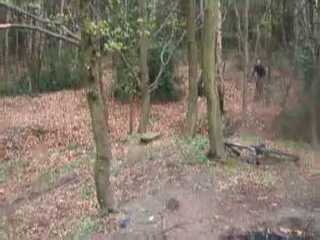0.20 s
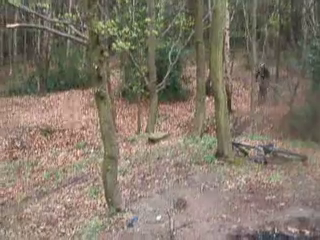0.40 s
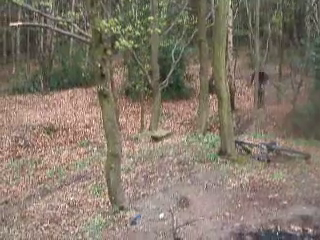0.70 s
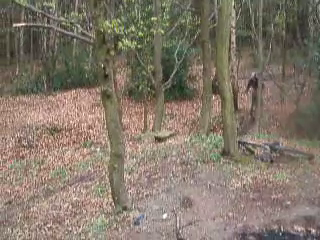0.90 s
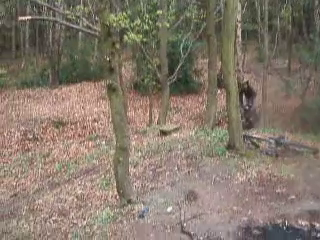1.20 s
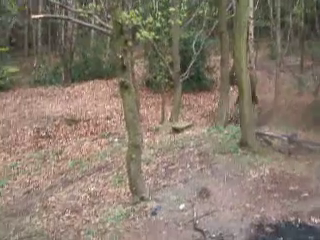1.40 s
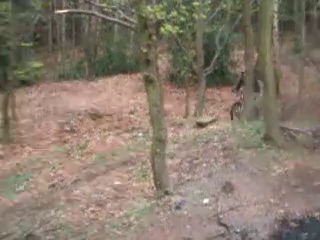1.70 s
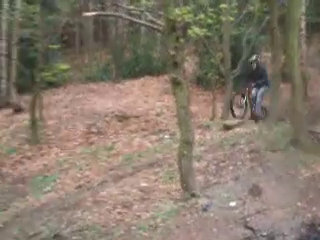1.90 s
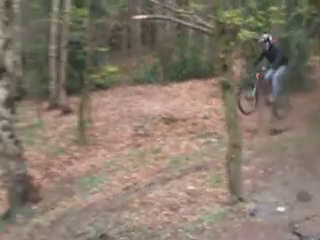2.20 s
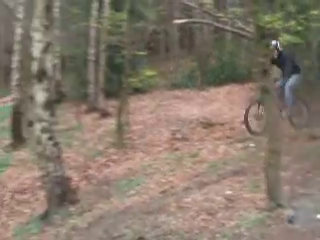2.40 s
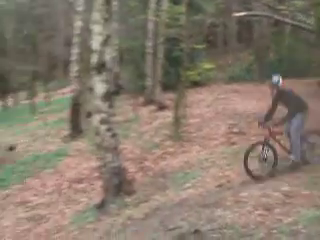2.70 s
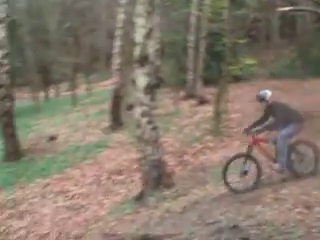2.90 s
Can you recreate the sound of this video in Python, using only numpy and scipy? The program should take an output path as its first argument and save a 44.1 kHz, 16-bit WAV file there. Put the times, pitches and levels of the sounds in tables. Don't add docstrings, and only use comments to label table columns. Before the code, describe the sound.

Bike landing with a sharp metallic chain slap and leaf crunch, after quiet woodland rumble and birdsong.

```python
import sys
import numpy as np
from scipy import signal
from scipy.fft import irfft
from scipy.io import wavfile
from scipy.ndimage import uniform_filter1d, map_coordinates

SR = 44100
rng = np.random.default_rng(int(sys.argv[2]) if len(sys.argv) > 2 else 0)


def to_wav(sig):
    pcm = np.clip(np.atleast_2d(sig), -1, 1) * 32767
    pcm = np.round(pcm).astype(np.int16)
    wavfile.write(sys.argv[1], SR, pcm.T)


def elevation(decibels):
    levels = np.asarray(decibels, float)
    return 10 ** (levels / 20)


N = 133623

# [t/s, level/dB]
TYRE_LOAD = [(.62, -60), (.78, -53), (.9, -58.5), (1.55, -51), (1.85, -57), (2.0, -52.5), (2.11, -46.5),
             (2.17, -52), (2.3, -57.5), (2.794, -66), (2.805, -34), (2.838, -38), (2.85, -34.5),
             (2.865, -39), (2.89, -35.5), (2.93, -43), (2.985, -40), (3.01, -44)]
# [f/Hz, density/dB]
LEAF_COLOUR = [(300, -17), (1400, -10.5), (2400, -3), (4300, -1), (6500, -1), (8000, -7.5)]
# [t/s, peak/dB, f/Hz, t60/s,
# resonance sharpness]
SNAPS = [(0.932, -43, 4630, 0.08, 2.5), (1.011, -39.5, 4920, .04, 1.4), (1.258, -46, 3800, 0.016, 2),
         (2.074, -37.5, 2110, 0.074, 16), (2.105, -43, 4500, .15, 2.2), (2.12, -41.5, 5210, .1, 1.5),
         (2.378, -37.5, 3870, 0.033, 1.1), (2.803, -22.5, 6440, .035, 8), (2.806, -29.5, 2460, 0.033, 3),
         (2.823, -26.5, 4460, 0.056, 9), (2.849, -30.5, 4180, 0.063, 5), (2.868, -25.5, 6420, 0.038, 2.5),
         (2.926, -36, 6740, .2, 2.5), (2.945, -34, 7150, .2, 3), (2.964, -35.5, 7050, 0.15, 1.7)]
# [t/s, peak/dB, f/Hz, t60/s]
CRACKLES = [(2.7965, -36, 1497, .03), (2.799, -37, 650, .08), (2.81, -37.5, 1700, .06),
            (2.82, -32, 4300, .04), (2.835, -38.5, 1200, .06), (2.8, -36, 3500, .012),
            (2.804, -31, 4580, .04), (2.811, -31, 5400, .02), (2.8132, -32.5, 2280, .015),
            (2.816, -30.5, 6970, .02), (2.818, -30, 2750, .02), (2.829, -32, 7350, .02),
            (2.831, -28, 2310, .015), (2.844, -30.5, 3010, .015), (2.845, -29.5, 4970, .02),
            (2.8494, -29, 2510, 0.022), (2.856, -32.5, 4550, .012), (2.867, -31, 3400, .015),
            (2.878, -27.5, 7000, .015), (2.886, -32.5, 5180, .02), (2.921, -33.5, 2740, .012),
            (2.956, -32.5, 4320, 0.014), (2.962, -32, 5500, .008), (2.9677, -27, 6500, 0.0092),
            (2.971, -31.5, 6030, .008), (2.976, -29, 7080, .012), (2.9811, -24, 5300, .012),
            (2.989, -32, 6020, .012), (2.994, -31.5, 5200, .012)]
# [t/s, peak/dB, f/Hz]
TICKS = [(2.2564, -43, 6340), (2.3805, -39, 4030), (2.4858, -46, 3980), (2.4994, -43.5, 5300),
         (2.5396, -42, 6690), (2.5477, -42, 4180), (2.5767, -41, 3740), (2.611, -43, 3980),
         (2.6429, -45, 5620), (2.6736, -44, 5190), (2.6997, -46, 4510), (2.7299, -43, 5830),
         (2.7564, -43, 5780)]
# [t/s, slap peak/dB, thump/dB, pitch factor of the spot struck]
KNOCKS = [
    (.65, -70, -39, 1),
    (2.055, -60, -36, 1.2),
    (2.797, -36, -39, .6),
    (2.8774, -30, -60, .9),
    (2.8781, -6.5, -42, 1),
    (2.8799, -14, -60, 1.15),
    (2.8826, -21, -60, 1.1),
    (2.8858, -23, -60, .8),
    (2.8893, -19, -47, 1.4),
    (2.8925, -23, -60, .5),
]
# [f/Hz, level/dB, t60/s]
FRAME_MODES = [(750, -19, .02), (1250, -7, .007), (1630, 0, .009), (2200, -4, .009), (2800, -8, .008),
               (3330, -6, .012), (4450, -20, .006)]
# [t/s, length/s, f/Hz, warble depth/Hz, level/dB]
SONG = [(0.836, 0.073, 3087, 7.7, -63.5), (0.889, 0.068, 2685, 89, -53.5), (.95, .09, 2766, 143, -53.5),
        (1.041, .15, 2735, 140, -57), (1.26, 0.051, 3273, 45, -52.5), (1.256, .05, 2992, 210, -56),
        (1.315, .08, 3161, 20, -48), (1.305, 0.097, 2923, 80, -54), (1.439, 0.031, 3104, 180, -56),
        (1.6, 0.039, 3320, 36, -48), (1.62, .04, 2797, 30, -53.5), (1.645, 0.091, 3149, 60, -47),
        (1.69, .1, 2853, 35, -56.5), (1.84, 0.049, 3150, 30, -61), (1.655, .08, 3300, 20, -53),
        (1.59, .1, 2950, 60, -58), (1.74, .08, 2790, 30, -56), (1.33, .06, 2760, 60, -58),
        (2.007, 0.031, 3320, 30, -50), (2.0, .11, 2950, 120, -52.5), (2.06, .13, 3130, 70, -52),
        (2.192, 0.055, 2750, 89, -55.5), (2.433, 0.067, 3310, 150, -55.5), (2.441, 0.098, 2939, 52, -55.5),
        (2.511, .05, 3144, 35, -48.5), (2.575, 0.033, 3200, 35, -54.5), (2.53, 0.038, 2845, 37, -56.5),
        (2.605, .07, 3000, 150, -55), (2.36, 0.12, 4600, 61, -61), (2.21, .1, 4800, 60, -61),
        (2.28, 0.18, 3150, 120, -62), (2.57, .12, 3800, 15, -68)]
# [t/s, f/Hz, level/dB]
DRONE = [(0.11, 107, -50.5), (0.47, 105.1, -58.5), (0.66, 107.4, -77.5), (0.7, 107.3, -61),
         (0.92, 104.4, -62), (1.28, 104.3, -50), (1.58, 103.6, -58), (1.98, 104.7, -50.5),
         (1.99, 104.3, -56), (2.03, 104, -59.5), (2.33, 104.2, -60), (2.49, 106.7, -62), (2.71, 104.6, -54),
         (3.0, 104.2, -62)]
# [t/s, level/dB]
TRAFFIC = [(0, -45), (.3, -45.4), (.6, -46), (.7, -44.6), (.8, -46), (1.0, -47), (1.3, -45), (1.55, -47),
           (1.76, -48), (1.9, -45.5), (2.1, -45), (2.35, -49.5), (2.75, -51), (3.03, -50)]
# [f/Hz, density/dB]
RUMBLE_COLOUR = [(20, -31.5), (70, -19.5), (130, -10.5), (240, 1), (340, -3.5), (760, -10.5), (1400, -22),
                 (3000, -32.5)]
# [f/Hz, gain/dB]
SMOOTHING = [(6900, 0), (7500, -1), (8000, -5.5), (8500, -15), (8900, -30), (9200, -60)]


def unit(x):
    return x / np.sqrt(np.mean(x ** 2) + 1e-20)


def along(points, hz):
    f, v = np.transpose(points)
    return np.interp(np.log(hz + 1), np.log(f + 1), v)


def curves(rows):
    s, *cols = np.transpose(rows)
    return [np.interp(np.arange(N) / SR, s, c) for c in cols]


def wobble(rate):
    knots = rng.standard_normal(int(N * rate / SR) + 4)
    return map_coordinates(knots, [np.arange(N) * rate / SR])


def add(out, s, x):
    part = out[round(s * SR):][:len(x)]
    part += x[:len(part)]


def rush(colour, patchy_db):
    hz, _, z = signal.stft(rng.standard_normal(N + 512), SR, nperseg=2048)
    patches = uniform_filter1d(rng.standard_normal(z.shape), 12, 0)
    patches = unit(uniform_filter1d(patches, 2, 1))
    gain_db = patchy_db * patches + along(colour, hz)[:, None]
    return unit(signal.istft(z * elevation(gain_db), nperseg=2048)[1][:N])


def burst(db, hz, t60, sharp, rise_s, broad):
    t = np.arange(SR // 8) / SR
    noise = rng.standard_normal(len(t))
    b, a = signal.iirpeak(min(hz, 8000), max(sharp, 1), SR)
    body = unit(signal.lfilter(b, a, noise)) + broad * noise
    return elevation(db - 4 - 60 * t / t60) * (1 - np.exp(-t / rise_s)) * body


def leaves():
    level_db, = curves(TYRE_LOAD)
    count = int(2400 * N / SR)
    samples = np.arange(96)
    t = samples / SR
    hz = np.clip(3800 * np.exp(.5 * rng.standard_normal((count, 1))), 600, 7800)
    size = elevation(2.4 * rng.exponential(size=(count, 1)))
    start = rng.integers(0, N, size=(count, 1)) + samples
    shape = size * np.sin(2 * np.pi * hz * t) * np.exp(-t * hz / 2.7)
    grains = np.bincount(start.ravel(), shape.ravel(), N + 96)[:N]
    crunch = unit(rush(LEAF_COLOUR, patchy_db=3.0) + elevation(-2) * unit(grains))
    return elevation(level_db + 1.3 * wobble(60)) * crunch


def snaps():
    out = np.zeros(N)
    for s, db, hz, t60, sharp in SNAPS:
        add(out, s, burst(db, hz, t60, sharp, rise_s=.003, broad=.54))
    return out


def crackles():
    out = np.zeros(N)
    for s, db, hz, t60 in CRACKLES:
        add(out, s, burst(db + 2.5, hz, t60, sharp=6.1, rise_s=.0007, broad=.33))
    return out


def ticks():
    out = np.zeros(N)
    for s, db, hz in TICKS:
        add(out, s, burst(db - 1.5, hz, t60=.025, sharp=2.5, rise_s=.0007, broad=.9))
    return out


def frame():
    out, t = np.zeros(N), np.arange(SR // 4) / SR
    for s, db, thump_db, spot in KNOCKS:
        ring = sum(elevation(level - 60 * t / t60) * np.sin(2 * np.pi * spot * hz * t)
                   for hz, level, t60 in FRAME_MODES)
        crack = .2 * elevation(-60 * t / .01) * rng.standard_normal(len(t))
        slap = -(ring + crack) * (1 - np.exp(-t / .00045))
        thump_hz = spot * 310
        b, a = signal.butter(2, [thump_hz / 1.4, thump_hz * 1.4], "band", fs=SR)
        thud = unit(signal.lfilter(b, a, rng.standard_normal(len(t))))
        thud *= elevation(thump_db - 60 * t / .16) * (1 - np.exp(-t / .0073))
        add(out, s, elevation(db - 4.5) * slap + thud)
    return out


def bird():
    warble_hz = 70
    out, waver, flutter = np.zeros(N), wobble(2 * warble_hz), elevation(2.5 * wobble(90))
    for s, length, hz, depth_hz, db in SONG:
        t = np.arange(int(length * SR)) / SR
        warble = depth_hz * np.sin(2 * np.pi * warble_hz * t)
        blur = (16 + .23 * depth_hz) * waver[round(s * SR):][:len(t)]
        phase = 2 * np.pi * np.cumsum(hz + warble + blur) / SR
        swell = np.abs(np.sin(np.pi * t / length)) ** .49
        add(out, s, np.sqrt(2) * elevation(db) * swell * np.sin(phase))
    return out * flutter


def wood(x):
    t = np.arange(SR) / SR
    tail = rng.standard_normal(SR) * elevation(-60 * t / .85) * (t > .01)
    return signal.fftconvolve(x, tail / np.linalg.norm(tail))[:N]


def engine():
    pitch_hz, level_db = curves(DRONE)
    phase = 2 * np.pi * np.cumsum(pitch_hz) / SR
    octave = elevation(-9 + 3 * wobble(8)) * np.sin(2 * phase + wobble(6))
    return np.sqrt(2) * elevation(level_db + 1.5 * wobble(20)) * (np.sin(phase) + octave)


def traffic():
    level_db, = curves(TRAFFIC)
    swell_db = .5 * wobble(9) + .8 * wobble(25)
    return elevation(level_db + swell_db) * rush(RUMBLE_COLOUR, patchy_db=.9)


def scene():
    crunch = leaves() + snaps() + crackles() + ticks()
    knocks, song = frame(), bird()
    echoes = wood(elevation(-12) * crunch + elevation(-15) * knocks + elevation(-5) * song)
    return (crunch + knocks + .75 * song + echoes + engine() + traffic())[None]


def band_limit(x):
    return signal.sosfilt(signal.butter(12, 8940, fs=SR, output="sos"), x)


def record(dry):
    step, offset = .00552, -.008
    count = round(N * 16000 / SR)
    coarse = step * np.round(signal.resample(dry[0] + offset, count) / step)
    hz = np.fft.rfftfreq(N, 1 / SR)
    mirrored = np.fft.fft(coarse)[np.arange(len(hz)) % count] * N / count
    smooth = irfft(mirrored * elevation(along(SMOOTHING, hz)) * (hz < 9250), N)
    started = np.arange(N) >= 3200
    return band_limit((smooth * started)[None])


dry = scene()
out = record(dry)
to_wav(out)
```